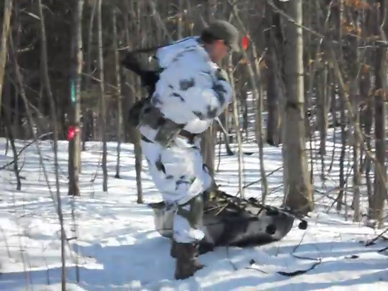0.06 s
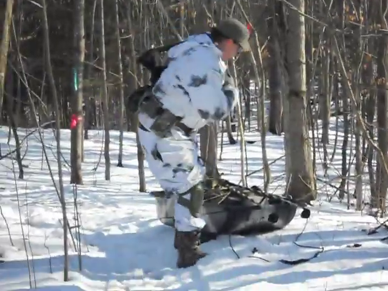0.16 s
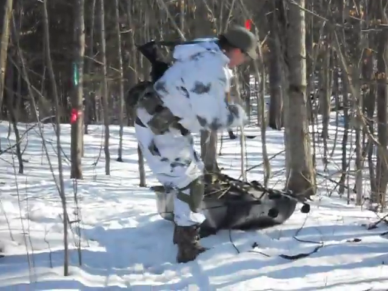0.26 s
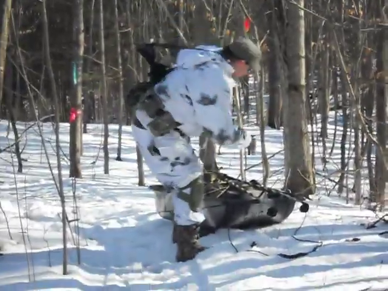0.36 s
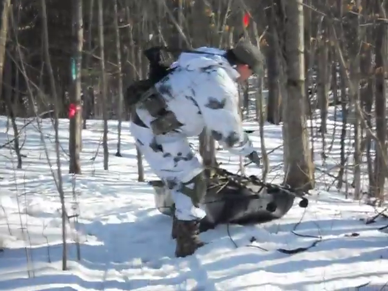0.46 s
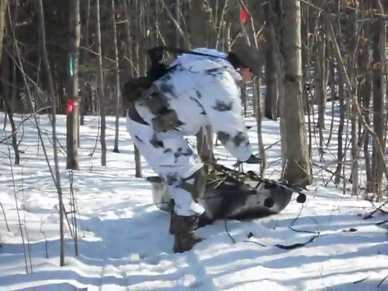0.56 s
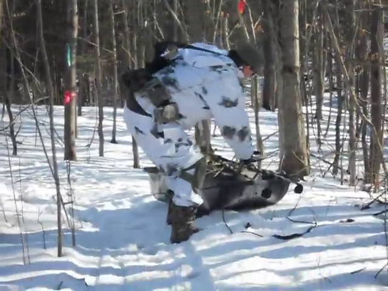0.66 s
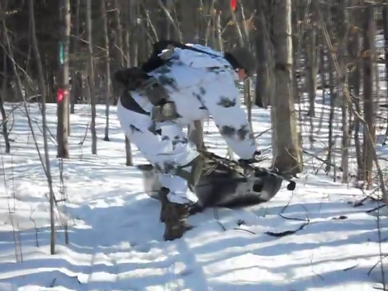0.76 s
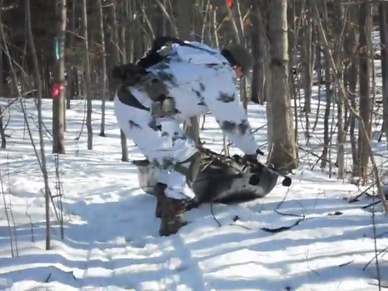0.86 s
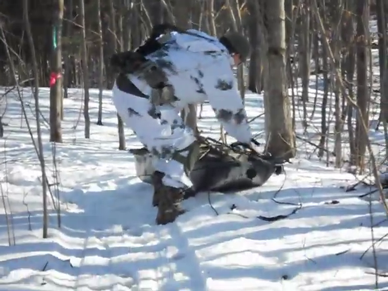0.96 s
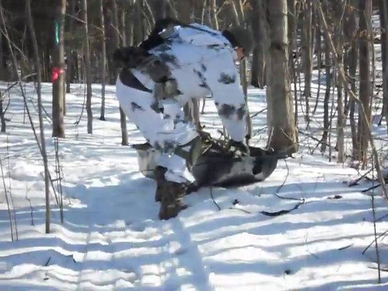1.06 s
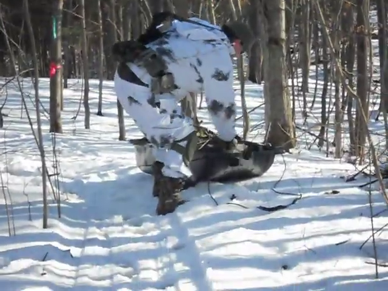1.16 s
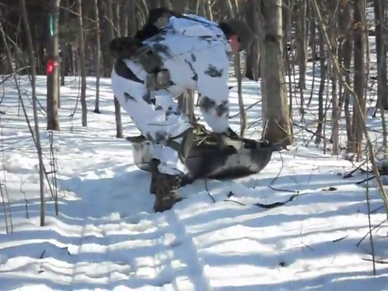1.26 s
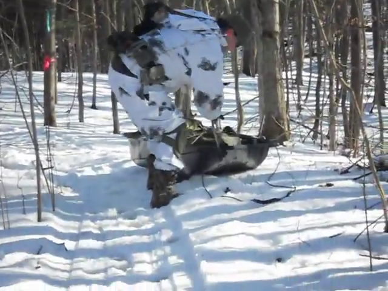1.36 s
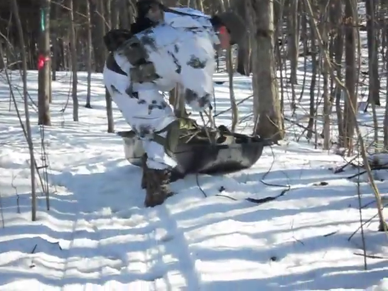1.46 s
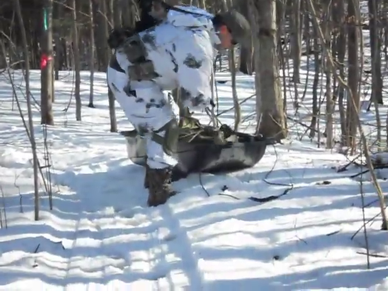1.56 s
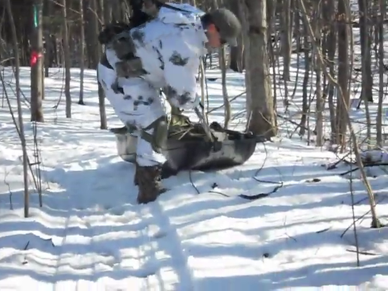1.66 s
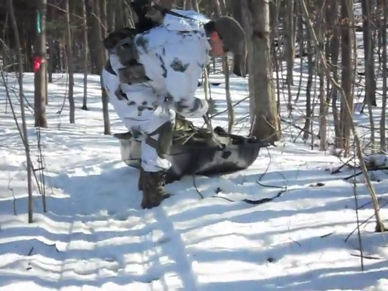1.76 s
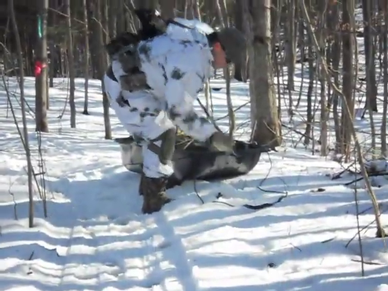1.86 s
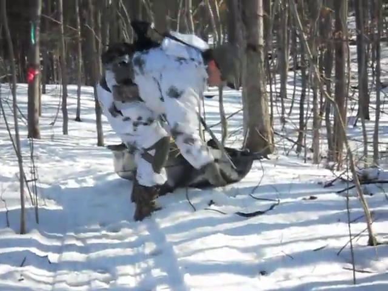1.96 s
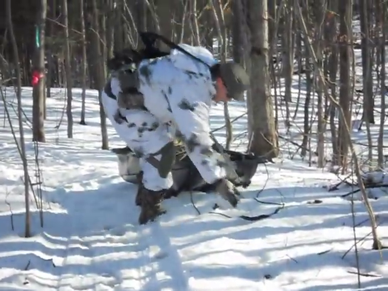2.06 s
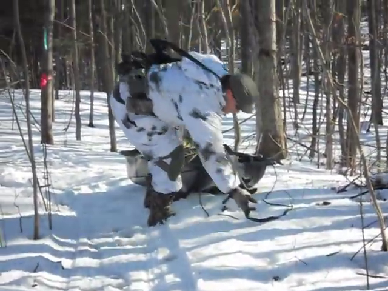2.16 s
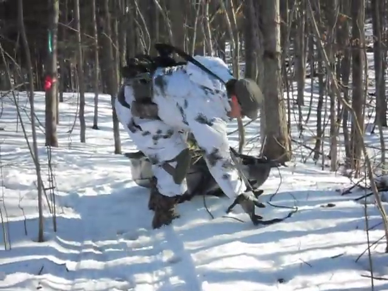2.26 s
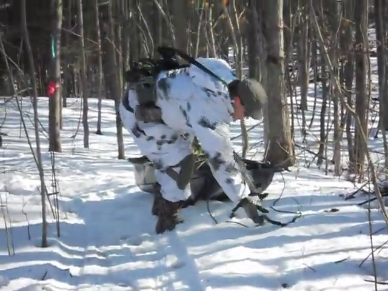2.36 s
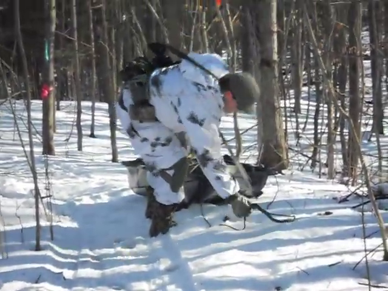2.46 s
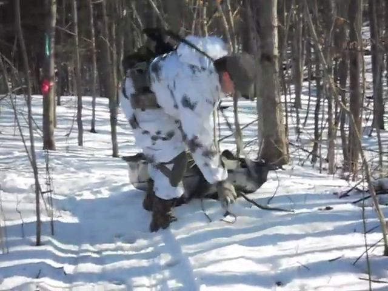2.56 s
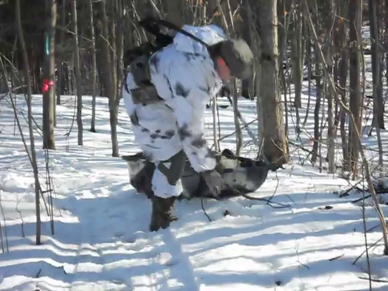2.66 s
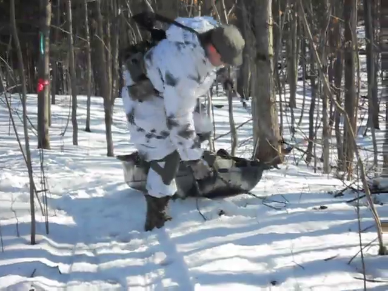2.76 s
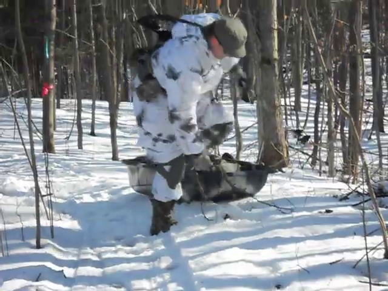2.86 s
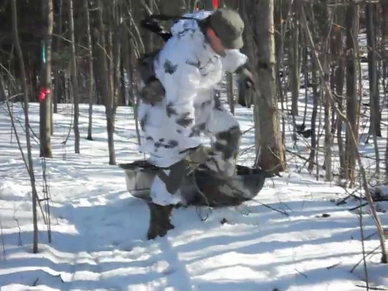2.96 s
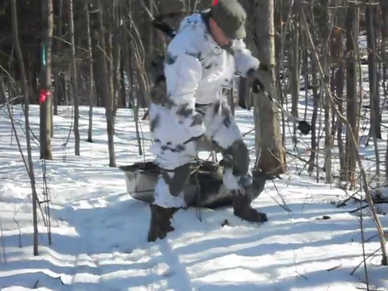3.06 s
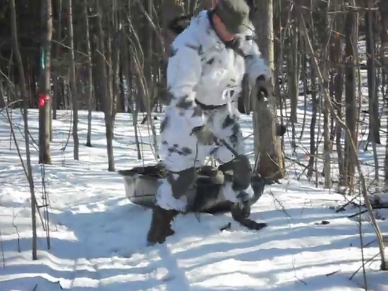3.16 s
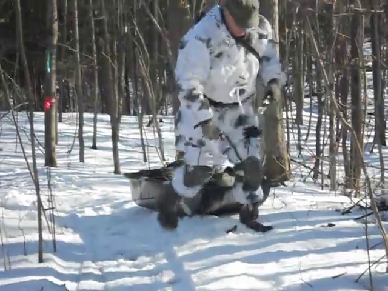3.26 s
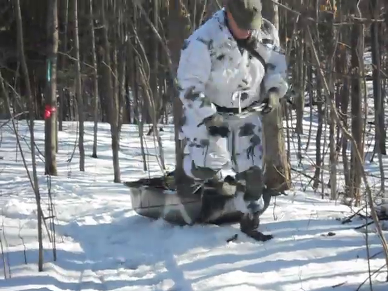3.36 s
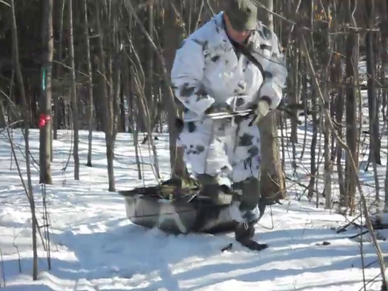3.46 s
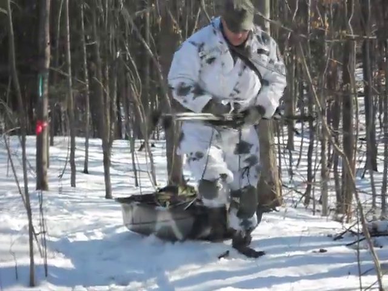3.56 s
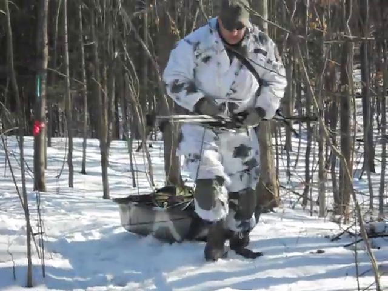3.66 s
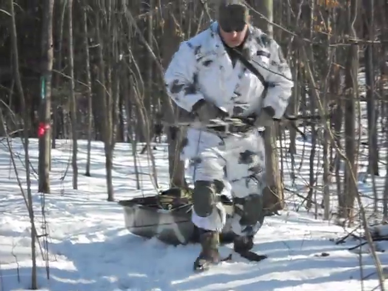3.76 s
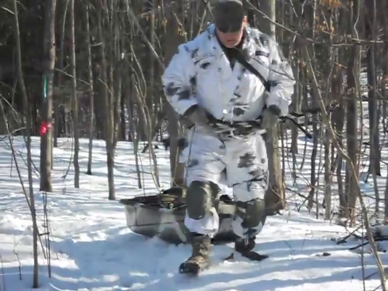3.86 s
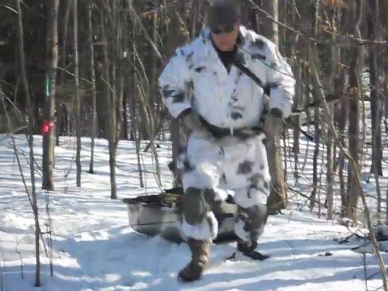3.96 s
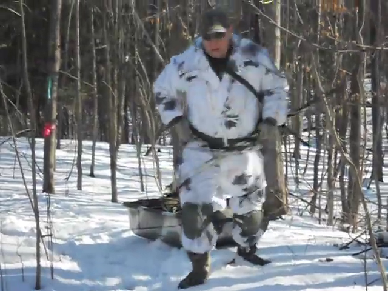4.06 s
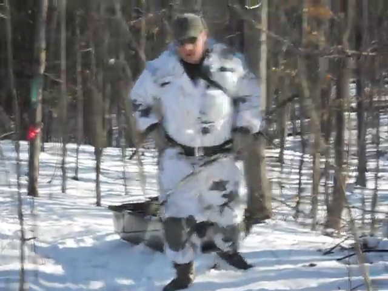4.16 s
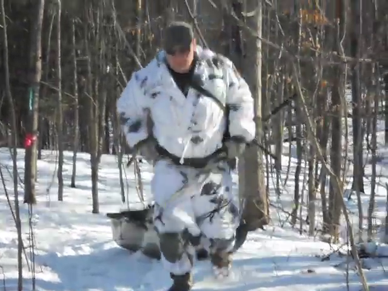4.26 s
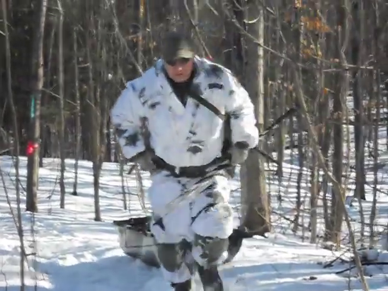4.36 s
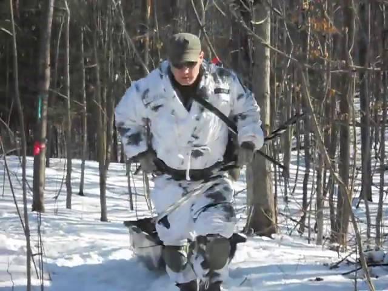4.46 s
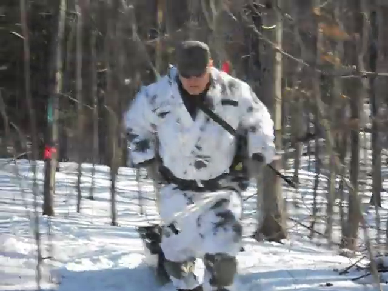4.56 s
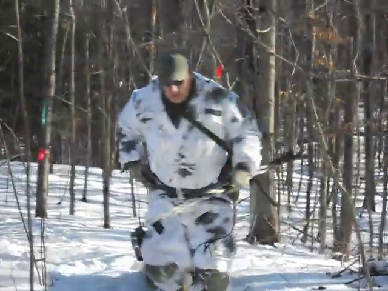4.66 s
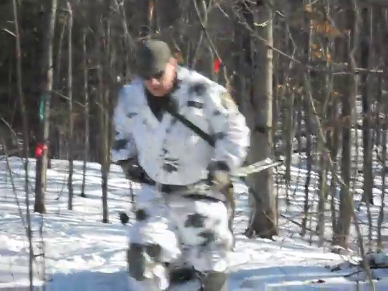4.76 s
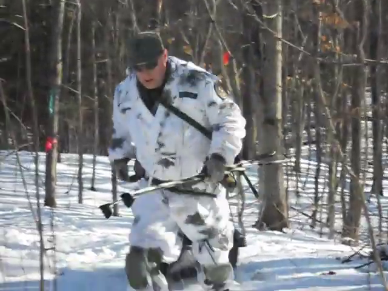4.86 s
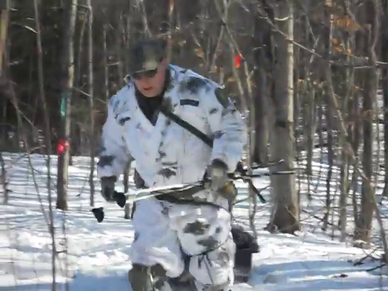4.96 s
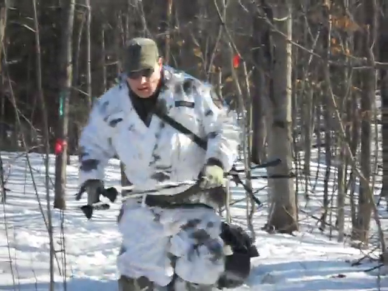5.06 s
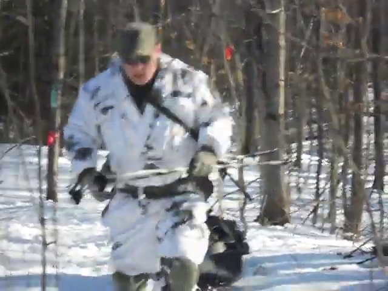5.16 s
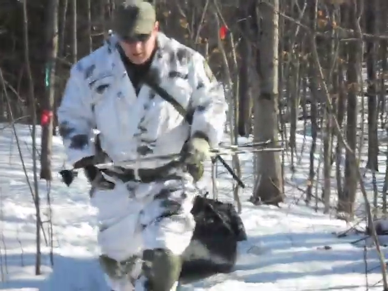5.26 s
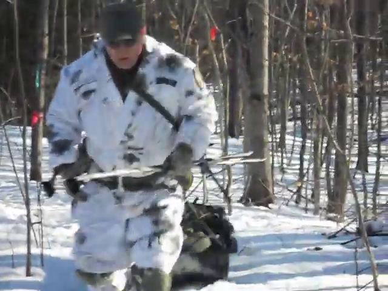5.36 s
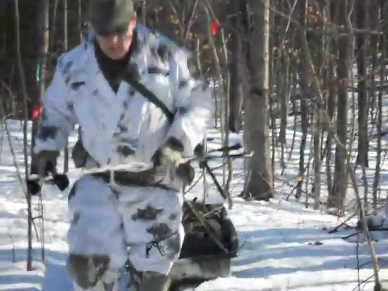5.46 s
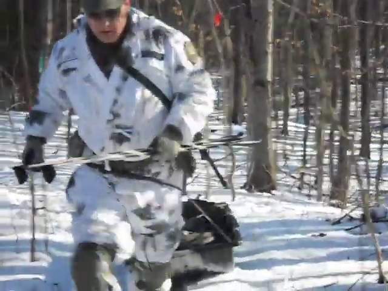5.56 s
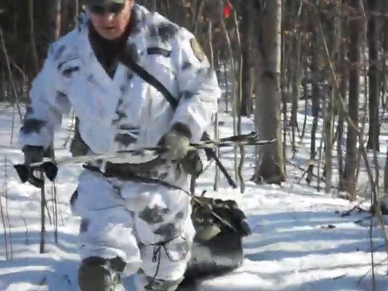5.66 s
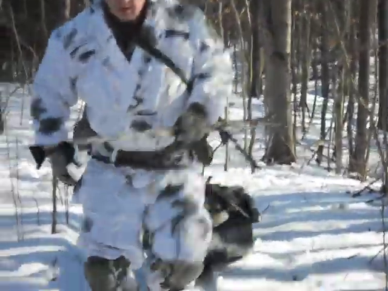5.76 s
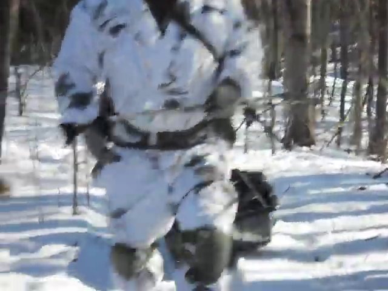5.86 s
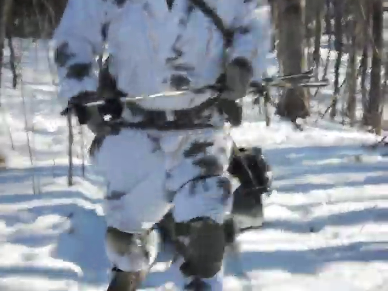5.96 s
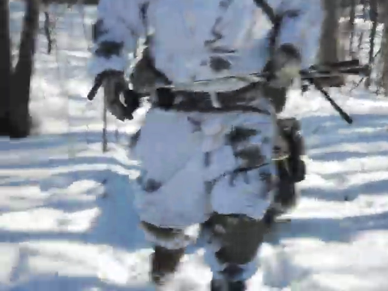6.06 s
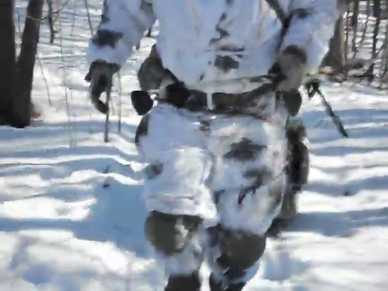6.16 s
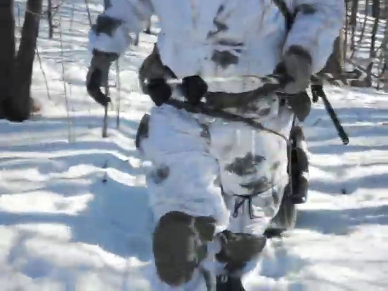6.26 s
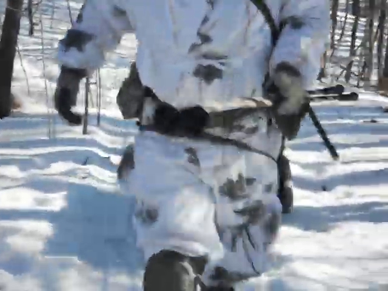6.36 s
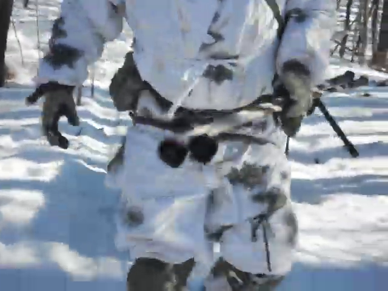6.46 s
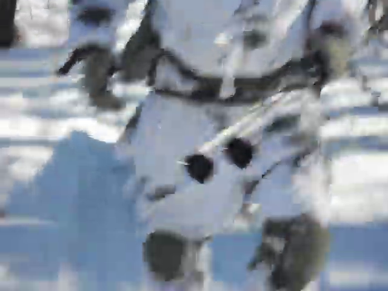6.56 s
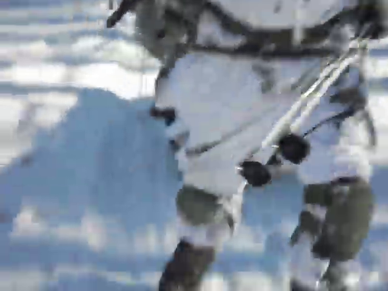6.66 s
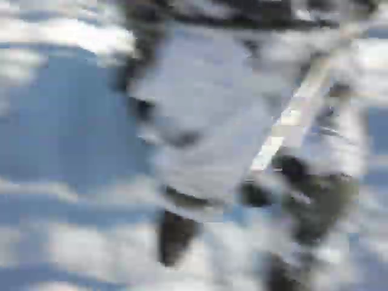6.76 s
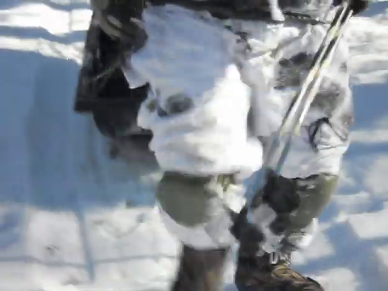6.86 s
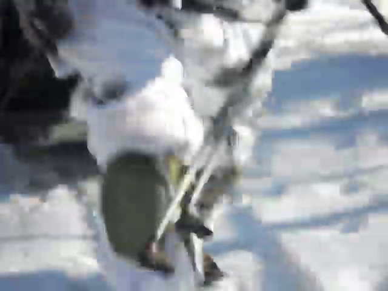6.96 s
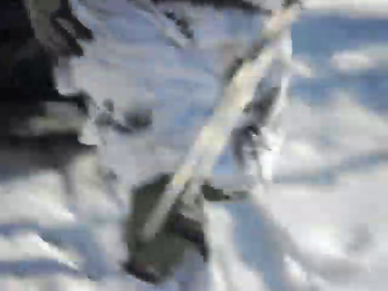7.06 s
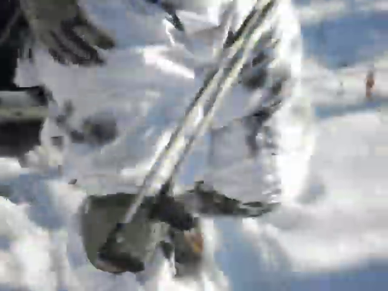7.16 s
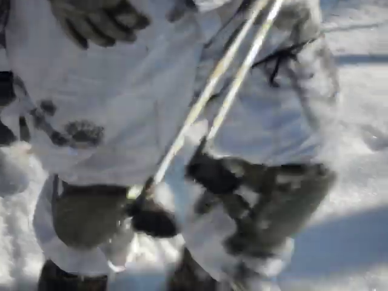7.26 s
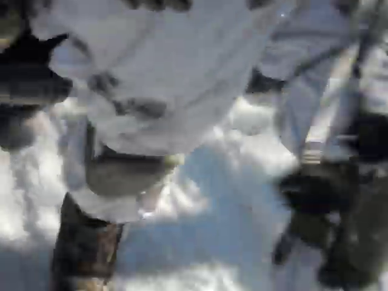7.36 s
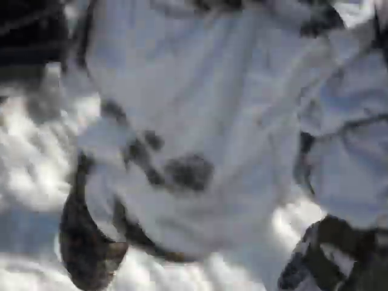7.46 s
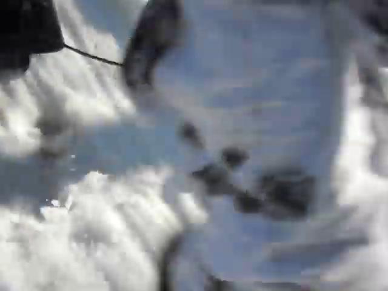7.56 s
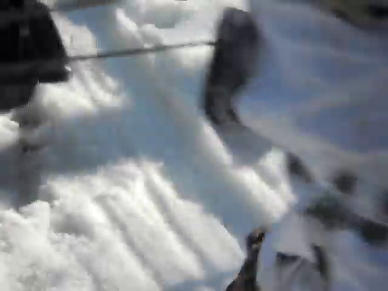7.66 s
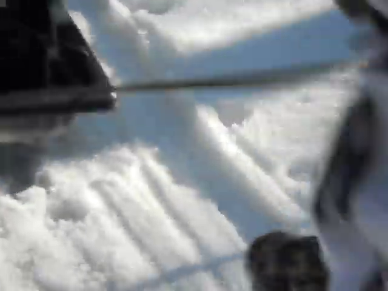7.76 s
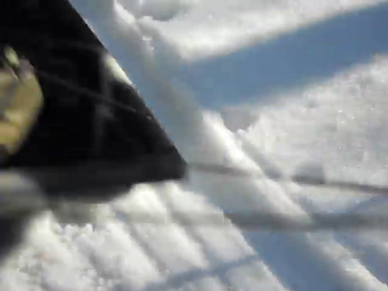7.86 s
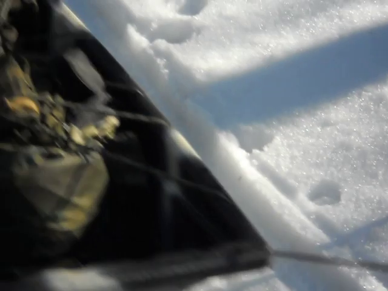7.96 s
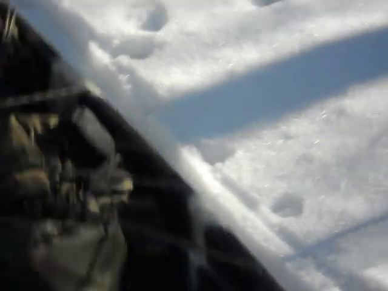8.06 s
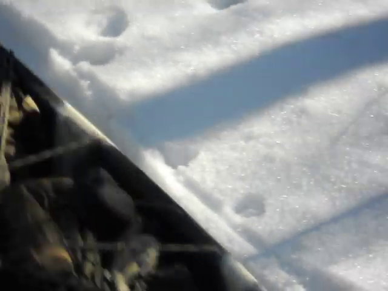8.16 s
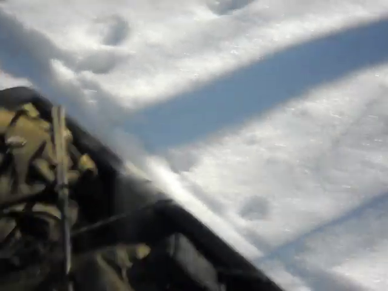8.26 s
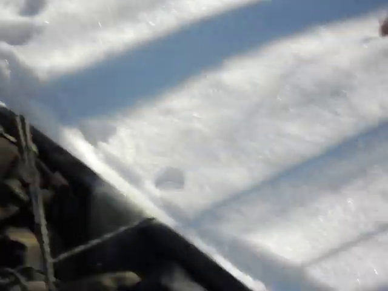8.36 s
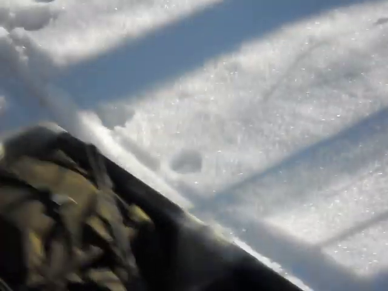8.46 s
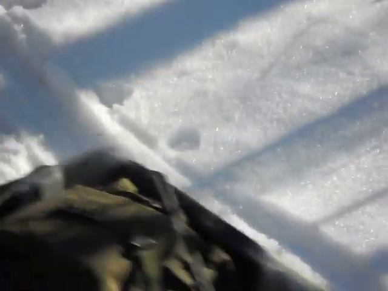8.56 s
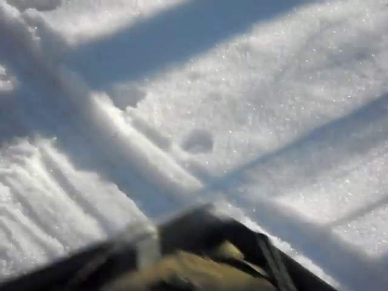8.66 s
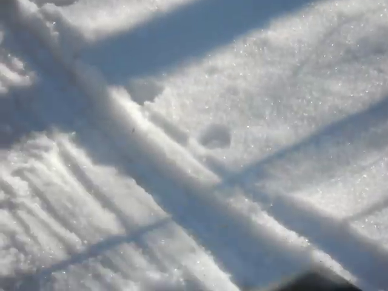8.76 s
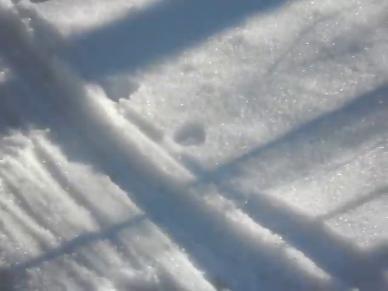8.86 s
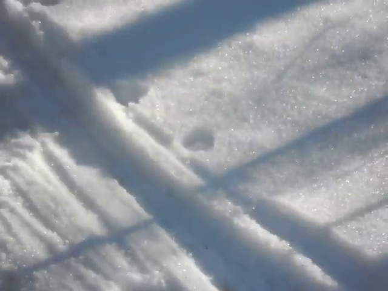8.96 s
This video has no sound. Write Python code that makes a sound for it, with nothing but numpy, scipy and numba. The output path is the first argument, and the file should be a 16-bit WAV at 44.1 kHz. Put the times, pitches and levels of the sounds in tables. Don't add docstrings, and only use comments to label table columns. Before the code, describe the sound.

Poles, buckles and clips knock and click over faint hiss, then a loaded plastic sled scrapes loudly past through crusty snow.

```python
import sys
import numpy as np
from scipy import signal
from scipy.fft import rfft, irfft, next_fast_len
from scipy.io import wavfile
from scipy.ndimage import uniform_filter1d
from numba import njit

SR = 44100
rng = np.random.default_rng(int(sys.argv[2]) if len(sys.argv) > 2 else 0)


def magnitude_from_level(level_db):
    exponent = np.asarray(level_db, float) / 20
    return 10 ** exponent


def file_out(sig):
    cols = np.atleast_2d(sig).T
    lim = np.clip(cols, -1, 1)
    pcm = np.round(lim * 32767).astype(np.int16)
    wavfile.write(sys.argv[1], SR, pcm)


N = 397850

# time in seconds, hiss in dB, view of the runners in dB, crust load in dB.
STRIDES = [(4.3, -46, 3, 2.5), (4.5, -31, -1, -3.5), (4.79, -31.5, -3.5, -5), (4.88, -27, -0.5, -5.5),
           (5.1, -26, -2.5, -5.5), (5.42, -21, -2, -10), (5.69, -20, -1, -9.5), (6.08, -28, -5, -4),
           (6.13, -23, -4, -5), (6.48, -20.5, -5.5, -5), (6.83, -29, -3.5, -0.5), (6.94, -23.5, 0.5, -7.5),
           (7.2, -25, 2, -4.5), (7.51, -20, 0.5, -9.5), (7.81, -30.5, 1.5, -5.5), (8.3, -29.5, 2, -4),
           (8.67, -21.5, -.5, -3.5), (9.02, -27, -5.5, -4.5)]
# time in seconds, hiss centre in Hz, sheen centre in Hz.
BRIGHT_LOBES = [(4.25, 4650, 8860), (5.91, 4800, 8900), (6.72, 4700, 8950), (7.17, 5500, 9440),
                (7.85, 5600, 8900), (8.42, 4700, 8060), (8.53, 4470, 8000), (8.6, 5000, 9600),
                (8.75, 4940, 9400), (9.02, 5030, 8900)]
# time in seconds, dip in Hz,
# dip depth 0-1, boom in Hz, gap above the boom in Hz.
PASSING_BY = [(4.25, 2850, 0.2, 287, 510), (5.5, 2790, 0.6, 310, 490), (6.2, 2830, 0.5, 240, 484),
              (7.05, 2970, 0.56, 233, 560), (7.6, 3320, 0.47, 260, 600), (8, 2700, 0.4, 291, 620),
              (8.4, 2580, 0.8, 305, 570), (8.55, 2220, 0.9, 380, 566), (9.02, 2130, .95, 362, 560)]
# time in seconds, length in seconds, crust swell in dB, hiss swell in dB.
RIDGE_JOLTS = [(4.88, 0.02, 3, 1), (5.25, 0.044, 2.5, 1.5), (5.45, 0.024, 0, 1.5), (5.345, .006, 1, 2.5),
               (5.6, .04, 0, -1), (6.365, .008, 1, 2), (5.5, 0.028, 2, -1), (6.39, 0.054, 3.5, -0.5),
               (6.58, 0.052, 1.5, 1.5), (6.628, 0.0092, 0, -1.5), (6.652, 0.018, 4, 0.5),
               (6.73, .025, 5, 0), (6.83, 0.04, 2.5, 0.5), (6.97, 0.023, 1.5, 0.5), (7.04, 0.028, 7, 0.5),
               (7.15, 0.045, 2, 4), (7.22, 0.052, 1, -3.5), (7.35, 0.16, 2.5, 1), (7.93, 0.034, 5, 4.5),
               (8.25, 0.061, 1.5, 2.5), (8.5, 0.069, 2.5, -0.5), (7.56, .04, -2.5, -1.5),
               (7.88, .03, -3, -1), (8.595, .03, 0.5, 1), (8.652, .012, -2, -3.5), (8.765, 0.032, 2.5, 0.5),
               (8.105, .015, -1, -3.5), (8.128, .008, -1, 0.5), (8.43, .02, 0, -2), (8.54, .02, 1, -1.5),
               (8.81, 0.023, 0, -1.5), (6.795, 0.013, -1.5, -3), (4.795, .01, -3, -0.5)]
# centre in Hz, width in Hz, level in dB.
HULL_MODES = [(840, 545, 4.5), (1080, 490, 0), (1620, 2260, -1.5), (2170, 1150, -1)]
BOOM_DB, BOOM_DB_PER_LOAD_DB, BOOM_DB_PER_JOLT_DB, DULL_DB_PER_JOLT_DB = -9, 0.82, 1.5, 0.29
DUCK_AT_S, DUCK_DB, DUCK_RECOVER_S = 7.808, -15.5, 0.25
# time in seconds, peak in dB, length in seconds, ring in Hz.
CRUST_CRUNCHES = [(3.13, -33, .015, 600), (3.52, -36, .04, 760), (3.57, -37, .03, 760),
                  (4.45, -36, 0.093, 170), (4.7, -25, .06, 740), (4.806, -14, .004, 700),
                  (4.807, -17, .004, 3000), (4.816, -15, .005, 2900), (4.806, -11, .004, 1700),
                  (4.813, -17, .005, 1950), (4.836, -19, .012, 1100), (4.856, -22, .01, 1500),
                  (4.898, -21, .012, 1050), (5.214, -21, .01, 1020), (5.345, -19, .008, 1930),
                  (5.515, -20.5, .01, 1250), (6.028, -18, 0.0091, 2160), (6.341, -20.5, .04, 607),
                  (6.522, -19, .01, 1130), (6.649, -17, .012, 1300), (6.673, -19, .01, 850),
                  (6.74, -18, .012, 1650), (6.89, -20.5, .02, 1100), (7.02, -21, .008, 1920),
                  (7.049, -14, .01, 1320), (7.26, -19, 0.011, 1100), (7.419, -15, .006, 945),
                  (7.42, -15, .012, 2700), (8.068, -23, .015, 3400), (8.005, -28, .012, 1600),
                  (8.071, -27, .015, 1500), (8.1, -27, .01, 1400), (8.47, -20, .012, 1250),
                  (8.47, -21, .012, 1980), (8.431, -22, .025, 600), (8.599, -15, .03, 3500),
                  (8.679, -11.5, 0.038, 3600), (8.77, -9, .025, 6040), (8.779, -17, .03, 3500),
                  (8.589, -17, .015, 800), (8.609, -14, .015, 1320), (8.715, -18, 0.016, 1380),
                  (8.742, -14, .012, 670), (8.745, -17, .012, 1180), (8.785, -17, 0.011, 1370),
                  (8.786, -18, .01, 410), (8.946, -19.5, .012, 347), (9.0, -19.5, .02, 600)]
CRUSH_TRIM_DB = -3.5
# time in seconds, peak in dB, length in seconds, centre in Hz.
SNOW_SCUFFS = [(0.11, -10.5, 0.012, 5300), (0.2, -27, 0.03, 3500), (0.152, -28, 0.018, 5510),
               (1.982, -22, 0.02, 4590), (3.7794, -19.5, 0.036, 7400), (4.314, -18.5, 0.015, 7760),
               (5.34, -3.5, 0.016, 3860), (5.43, -5, 0.027, 5190), (6.649, -3.5, 0.017, 3840),
               (6.732, -4, 0.016, 4600), (6.766, -5.5, 0.015, 4410), (7.123, 2.5, 0.033, 9000),
               (7.188, 3, 0.011, 9500), (7.251, 1, 0.026, 8660), (7.345, 3.5, 0.015, 9200),
               (7.9264, -14, 0.016, 8840), (7.993, -13, 0.015, 8700), (8.128, -21, 0.013, 8390),
               (8.457, -5, 0.033, 7970)]
# time in seconds, peak in dB, pitch in Hz, t60 in seconds.
BOOT_THUMPS = [(0.129, -27, 252, 0.16), (0.914, -26.5, 235, 0.084), (1.025, -33, 260, 0.12),
               (1.106, -32, 225, 0.16), (1.138, -29, 262, 0.094), (1.19, -32, 245, 0.042),
               (1.982, -35, 240, .06), (3.124, -35, 263, 0.095), (3.919, -26.5, 162, 0.066),
               (4.322, -29.5, 339, 0.071), (4.763, -27, 194, 0.047), (5.45, -25, 340, 0.093),
               (6.019, -22, 342, 0.089), (6.379, -18.5, 350, 0.08), (6.41, -20, 234, 0.073),
               (6.682, -12, 150, 0.05), (7.044, -18, 229, 0.13), (7.5, -27, 222, 0.074),
               (8.247, -21.5, 285, 0.13), (8.749, -16, 445, 0.095)]
# time in seconds, peak in dB, pitch in Hz, t60 in seconds, crack re ring in dB.
LOAD_KNOCKS = [(0.04, -17, 770, 0.035, -9), (0.144, -19.5, 790, 0.045, -9), (1.982, -25, 585, 0.038, -1),
               (4.023, -18, 840, 0.019, -59), (4.142, -24, 805, 0.025, -8), (4.191, -30, 832, 0.04, -12),
               (4.226, -22.5, 854, 0.024, -14), (4.254, -18.5, 804, 0.042, -8), (4.804, -7, 1110, 0.03, -2),
               (4.812, -10, 1010, 0.042, 1.5), (4.822, -14, 1750, 0.079, 0), (4.879, -22, 1050, 0.051, -12),
               (5.279, -18, 850, 0.045, -6), (5.441, -18.5, 1095, 0.092, -10),
               (6.23, -14.5, 1250, 0.079, -25), (6.255, -15, 1420, 0.045, -25), (6.379, -9, 1020, 0.048, 4),
               (6.585, -11.5, 1174, 0.13, -20), (7.044, -9.5, 766, 0.049, 0), (7.817, -21, 1000, 0.02, 2),
               (7.926, -20.5, 1430, 0.054, -3), (7.964, -24, 1890, 0.037, -12),
               (8.125, -19.5, 1400, 0.03, 1), (8.24, -18, 1160, 0.046, -12)]
# Hz, level in dB, t60 in seconds.
STRIKES = [
    (4.1435, -3, [(2640, -0.5, 0.01), (3540, -5, .013), (4190, -0.5, .008), (5410, -2, .013), (6110, -1, .009), (7200, -13, .006), (8600, -17, .006), (9800, -13, .008)]),
    (7.817, -6, [(1680, -2, .02), (2210, -4, .013), (1300, -9, .01), (4290, -7, .017), (4750, -9, .008), (5170, -6, .01), (5800, -2, .007), (6250, -3, .014), (7600, -9, .008), (8100, -5, .012), (8500, -6, .008), (9500, -4, .007)]),
]
# time in seconds, peak in dB, rattle t60 in seconds, body in Hz,
# treble re body in dB.
POLE_CLACKS = [(1.027, -35, 0.043, 1280, -21), (1.132, -5.5, 0.025, 2860, -9),
               (1.141, -9.5, 0.026, 2700, -16), (1.181, -15, 0.048, 2190, -31),
               (1.194, -19, 0.036, 2660, -30), (1.202, -22.5, 0.031, 2770, -22),
               (1.292, -21, 0.048, 1030, -5), (1.296, -34, 0.02, 1280, -11), (1.34, -23, 0.035, 1100, -8),
               (1.566, -11, 0.035, 1970, -9.5), (1.571, -15.5, 0.017, 2390, -6),
               (1.581, -24, 0.034, 1510, -12), (1.595, -24, 0.04, 2350, -13),
               (1.616, -22.5, 0.051, 2370, -22), (1.637, -28, 0.033, 1290, -15),
               (1.68, -24, 0.043, 1170, -19), (2.801, -27, 0.026, 1700, -16),
               (3.438, -26, 0.025, 1300, -14), (4.813, -9.5, 0.019, 1050, -23)]
# centre in Hz, width in Hz, level in dB.
POLE_MODES = [(1260, 990, -4), (1920, 110, 7.5), (2280, 520, -2), (2860, 120, 8), (3100, 180, -4),
              (4500, 160, 5), (5300, 190, -2), (10200, 260, -4)]
# time in seconds, peak in dB, pitch in Hz, t60 in seconds, crack re ring in dB.
CLIP_TICKS = [(0.0462, -13.5, 2390, 0.033, 4), (0.1291, -10, 5600, 0.019, 7), (0.133, -8, 4300, 0.02, 13),
              (0.2783, -24, 2520, 0.025, 6), (0.3017, -31, 5200, 0.025, 2), (0.3212, -22.5, 4400, 0.022, 2),
              (0.407, -29.5, 7930, 0.025, 7), (2.801, -35, 3600, .03, -5), (3.438, -30, 4100, .025, 3),
              (4.805, -21, 4050, .03, -5), (4.8135, -16, 4100, .025, -5), (4.1534, -28, 3330, 0.025, 0),
              (4.8655, -10, 8540, 0.023, 0), (7.0956, -9, 9160, 0.023, 0), (4.821, -21, 3300, .025, -8),
              (8.125, -15, 8400, .03, -3)]
# time in seconds, peak in dB, pitch in Hz, t60 in seconds.
CLIP_JINGLE = [(.222, -26, 7100, .04), (.2365, -21.5, 7130, 0.031), (.2365, -22.5, 9250, .035),
               (.249, -28, 7150, .03), (.25, -30, 8600, .06), (.267, -34, 7040, .05),
               (2.158, -42, 8600, .05)]
# time in seconds, swish in dB, low rustle in dB.
CLOTH_LEVELS = [(0, -47.5, -49), (1.1, -49, -50.5), (1.5, -51, -54), (1.75, -50.5, -52), (2.9, -49, -50),
                (3.7, -44, -49.5), (4.5, -39, -44)]
# time in seconds, length in seconds, swish swell in dB, low swell in dB.
CLOTH_MOVES = [(.05, 0.03, -4, 3), (.14, 0.12, 12.5, 9), (1.11, .08, 8.5, 11), (1.21, 0.045, -12, 7.5),
               (1.29, 0.043, 8, -2), (1.61, 0.042, 11, 9.5), (2.62, 0.069, 4.5, 5.5),
               (3.13, 0.071, 12.5, 7), (3.25, 0.028, 5, 3), (3.52, .09, 1.5, 5.5), (3.8, .06, 4, 3),
               (3.96, 0.068, 7, 5), (4.1, 0.053, 8, 9), (4.37, 0.11, 3, -2)]
# time in seconds, gain in dB.
CAMERA_GAIN = [
    (0, 3),
    (1.12, 4),
    (1.2, -1.5),
    (4.1, 3.5),
    (7.8, 6.5),
    (7.82, 0),
    (9.02, 15.5),
]
# frequency in Hz, density in dB per Hz.
FLOOR_SPECTRUM = [(47, -42), (80, -13), (150, -8.5), (333, -6.5), (2210, -12), (6500, -18), (10400, -19),
                  (13500, -59)]
FLOOR_DB = -43
# centre in Hz, width in Hz, rms in dB.
WHINES = [(7830, 80, -60.5)]
# time in seconds, length in seconds, swell in dB.
PORT_PUFFS = [(.03, 0.17, 9), (.58, .15, 3), (.98, 0.18, 7), (2.44, .2, 2.5), (5.62, .12, 6),
              (5.87, .07, -10), (6.48, .08, 9), (6.68, .09, 12), (7.03, .09, 2), (7.51, 0.1, 9),
              (8.49, .1, 16)]
BUFFET_DB, BUFFET_RISE_DB_PER_S, BUFFET_STOP_DB = -58.5, 1.14, -18
# frequency in Hz, gain in dB.
MIC_RESPONSE = [(15, 11.5), (40, -1), (10200, -0.5), (11000, -11), (11700, -10.5), (12300, -20),
                (12600, -60)]


def unit(x):
    return x / np.sqrt(np.mean(x ** 2))


def curves(table):
    s, *columns = np.transpose(table)
    return [np.interp(np.arange(N) / SR, s, c) for c in columns]


def swells(table):
    t = np.arange(0, N, 32) / SR
    s, length_s, *columns = np.transpose(table)
    bells = np.exp(-((t[:, None] - s) / np.maximum(length_s, .01)) ** 2)
    return [np.interp(np.arange(N) / SR, t, bells @ c) for c in columns]


def colour(x, points):
    hz, db = np.transpose(points)
    size = next_fast_len(len(x))
    log_hz = np.log(np.arange(size // 2 + 1) * SR / size + 1)
    gain = magnitude_from_level(np.interp(log_hz, np.log(hz), db))
    return irfft(rfft(x, size) * gain, size)[:len(x)]


@njit
def svf(x, hz, width):
    y, b, l = np.empty(len(x)), 0., 0.
    for i in range(len(x)):
        g, k = np.tan(np.pi * hz[i] / SR), width / hz[i]
        v = (b + g * (x[i] - l)) / (1 + g * (g + k))
        b, l, y[i] = 2 * v - b, l + 2 * g * v, k * v
    return y


def band(x, hz, width_hz):
    return svf(x, np.clip(hz + np.zeros(len(x)), 20, .45 * SR), 1. * width_hz)


def band_twice(x, hz, first_width_hz, second_width_hz):
    return band(band(x, hz, first_width_hz), hz, second_width_hz)


def walk(rate_hz):
    k = int(SR / rate_hz)
    steps = np.repeat(rng.standard_normal(N // k + 1), k)
    steps = uniform_filter1d(uniform_filter1d(steps, k), k)[:N]
    return unit(steps - uniform_filter1d(steps, size=4 * k))


def grains(rate_hz, spread_db):
    chance, size, sign = rng.random(N), rng.exponential(size=N), rng.standard_normal(N)
    return unit((chance < rate_hz / SR) * magnitude_from_level(np.minimum(spread_db * size, 24)) * sign)


def fade(t, t60_s):
    return np.exp(-np.log(1000) * t / max(t60_s, .002))


def add(out, s, peak_db, x):
    i = int(s * SR)
    x = x[:N - i]
    out[i:i + len(x)] += magnitude_from_level(peak_db) * x / np.max(np.abs(x))


def sled():
    t = np.arange(N) / SR
    hiss_db, view_db, load_db = curves(STRIDES)
    jolt_db, surge_db = swells(RIDGE_JOLTS)
    hiss_hz, sheen_hz = curves(BRIGHT_LOBES)
    dip_hz, depth, boom_hz, gap_hz = curves(PASSING_BY)

    since_s = t - DUCK_AT_S
    duck_db = DUCK_DB * (since_s > 0) * np.exp(-(since_s / DUCK_RECOVER_S) ** 2)
    hiss_db = hiss_db + surge_db + duck_db
    sheen_db = view_db - DULL_DB_PER_JOLT_DB * jolt_db
    crust_db = load_db + jolt_db
    boom_db = BOOM_DB + BOOM_DB_PER_LOAD_DB * load_db + BOOM_DB_PER_JOLT_DB * jolt_db
    stick_slip_db = .35 * walk(30) + .7 * walk(120)

    hiss = unit(band_twice(grains(14000, 0.81), hiss_hz, 4100, 8400))
    sheen = unit(band_twice(grains(14000, 0.94), sheen_hz, 4600, 4200))
    hiss = hiss * magnitude_from_level(.45 * walk(60))
    sheen = sheen * magnitude_from_level(.45 * walk(60))

    lump_db = .9 * walk(70)
    crust = np.zeros(N)
    for hz, width_hz, db in HULL_MODES:
        mode_gain = magnitude_from_level(db + .9 * walk(25))
        crust += mode_gain * band_twice(grains(2200, 1.1), hz, width_hz, 2.2 * width_hz)
    boom = band_twice(grains(3000, 1.96), boom_hz, 208, 390)
    boom = band(boom, boom_hz, 610)
    lumps = magnitude_from_level(lump_db) * (magnitude_from_level(crust_db) * unit(crust) + magnitude_from_level(boom_db) * unit(boom))

    body = hiss + magnitude_from_level(sheen_db) * sheen + lumps
    body = body - 0.22 * band(body, 0.78 * sheen_hz, 1000)
    body = body - np.clip(depth, 0, 1) * band(body, dip_hz, 770)
    body = body - 0.42 * band(body, 1.263 * dip_hz, 240)
    body = body + .3 * band(body, 5300, 600) + .2 * band(body, 4200, 400)
    body = body - 0.5 * band(body, gap_hz, 264)
    moving = np.clip((t - STRIDES[0][0]) / 0.072, 0, 1)
    return moving * magnitude_from_level(hiss_db + stick_slip_db) * body


def crunches():
    out, t = np.zeros(N), np.arange(int(.2 * SR)) / SR - .1
    for s, peak_db, length_s, hz in CRUST_CRUNCHES:
        cluster = rng.standard_normal(len(t)) * np.exp(-(t / max(length_s, .002)) ** 2)
        add(out, s + t[0], peak_db + CRUSH_TRIM_DB, band_twice(cluster, hz, .25 * hz, 0.63 * hz))
    return out


def scuffs():
    out, t = np.zeros(N), np.arange(int(.25 * SR)) / SR
    for s, peak_db, length_s, hz in SNOW_SCUFFS:
        phase = t / max(length_s, .002)
        swell = phase * np.exp(-2.5 * phase)
        snow = band(band(rng.standard_normal(len(t)), hz, 5100), 6300, 15000)
        add(out, s, peak_db - 8.0, swell * snow)
    return out


def hits(table, sharp, attack_cycles, usual_crack_db=-30):
    out, t = np.zeros(N), np.arange(int(.15 * SR)) / SR
    for s, peak_db, hz, t60_s, *own_db in table:
        crack_db = own_db[0] if own_db else usual_crack_db
        noise = rng.standard_normal((2, len(t)))
        ring = np.sin(2 * np.pi * hz * t) * fade(t, t60_s) * np.minimum(t * hz / attack_cycles, 1)
        rough = band(noise[0] * fade(t, t60_s), hz, hz / sharp)
        crack_hz = min(2.8 * hz + 300, 5000)
        contact = (fade(t, 1.5 * t60_s) + 1.2 * fade(t, 0.0068)) * np.minimum(t / 0.0012, 1)
        crack = band_twice(noise[1] * contact, crack_hz, 1.9 * crack_hz, 2 * crack_hz)
        add(out, s, peak_db, 1.15 * unit(ring) + unit(rough) + magnitude_from_level(crack_db) * unit(crack))
    return out


def snaps():
    out, t = np.zeros(N), np.arange(int(.06 * SR)) / SR
    for s, peak_db, modes in STRIKES:
        ring = sum(magnitude_from_level(db) * np.sin(2 * np.pi * hz * t) * fade(t, t60_s) for hz, db, t60_s in modes)
        add(out, s, peak_db, ring * np.minimum(t / 0.00049, 1))
    return out


def poles():
    out, t = np.zeros(N), np.arange(int(.1 * SR)) / SR
    for s, peak_db, t60_s, body_hz, treble_db in POLE_CLACKS:
        rattle = rng.standard_normal(len(t)) * fade(t, t60_s)
        rattle = rattle * magnitude_from_level(2.8 * rng.standard_normal(len(t))) * np.minimum(t / 0.0015, 1)
        weights_db = 1.1 * rng.standard_normal(len(POLE_MODES))
        ring = np.zeros(len(t))
        for k, (hz, width_hz, db) in enumerate(POLE_MODES):
            ring += (-1) ** k * magnitude_from_level(db + weights_db[k]) * band(rattle, hz, width_hz)
        ring = unit(ring)
        body = band_twice(0.45 * ring + unit(rattle), body_hz, 1.0 * body_hz, 3.3 * body_hz)
        crack = band(band(rattle * fade(t, 0.05), 4900, 6500), 5600, 8700)
        add(out, s, peak_db, unit(body) + 0.34 * ring + magnitude_from_level(treble_db + 1.5) * unit(crack))
    return out


def rustle():
    swish_db, low_db = np.add(curves(CLOTH_LEVELS), swells(CLOTH_MOVES))
    cloth = grains(6000, 0.72)
    high = unit(band(cloth, 2760, 5400))
    low = unit(band_twice(cloth, 800, 900, 1400))
    low = low * magnitude_from_level(0.88 * walk(12))
    still = np.clip((CLOTH_LEVELS[-1][0] - np.arange(N) / SR) / 0.2, 0, 1)
    return still * magnitude_from_level(1.5 * walk(25.28) - 2) * (magnitude_from_level(swish_db) * high + magnitude_from_level(low_db) * low)


def trunk_tail(knocks):
    t = np.arange(int(.3 * SR)) / SR
    trunks = rng.standard_normal(len(t)) * fade(t, 0.31) * np.minimum(t / 0.0064, 1)
    return magnitude_from_level(-54) * signal.fftconvolve(knocks, unit(trunks))[:N]


def camera_floor():
    t = np.arange(N) / SR
    hiss = magnitude_from_level(FLOOR_DB - 2) * unit(colour(rng.standard_normal(N), FLOOR_SPECTRUM))
    whine = sum(magnitude_from_level(db) * unit(band(rng.standard_normal(N), hz, width_hz)) for hz, width_hz, db in WHINES)
    air_db = BUFFET_DB + BUFFET_RISE_DB_PER_S * t + BUFFET_STOP_DB * (t > DUCK_AT_S)
    air_db = air_db + swells(PORT_PUFFS)[0]
    air = unit(band(band(rng.standard_normal(N), 35, 79), 38, 90))
    buffet = magnitude_from_level(air_db - 3 + 2.9 * walk(12)) * air
    return magnitude_from_level(curves(CAMERA_GAIN)[0]) * (hiss + whine) + buffet


def scene():
    snow = sled() + crunches() + scuffs()
    thumps = hits(BOOT_THUMPS, sharp=2.1, attack_cycles=0.94)
    load = hits(LOAD_KNOCKS, sharp=3.2, attack_cycles=0.6)
    clips = hits(CLIP_TICKS, sharp=4.0, attack_cycles=.6)
    clips = clips + hits(CLIP_JINGLE, sharp=16.0, attack_cycles=6.7, usual_crack_db=-6)
    knocks = thumps + load + poles() + clips
    return (snow + knocks + snaps() + rustle() + trunk_tail(knocks) + camera_floor())[None]


def band_limit(x):
    return signal.sosfilt(signal.butter(12, 12560, fs=SR, output="sos"), x)


def record(dry):
    x = colour(dry[0], MIC_RESPONSE)[None]
    mix = np.tanh(1.143 * x) / 1.08
    return band_limit(mix)


dry = scene()
out = record(dry)
file_out(out)
```